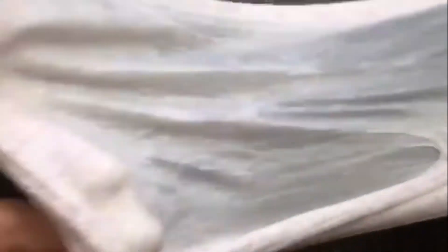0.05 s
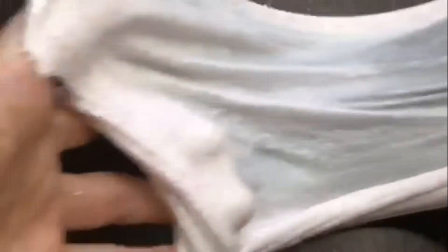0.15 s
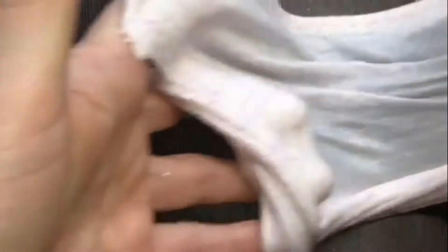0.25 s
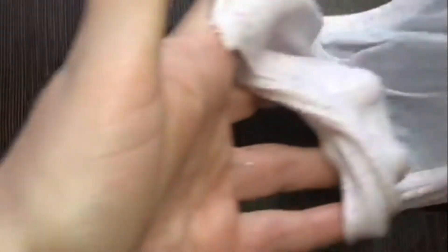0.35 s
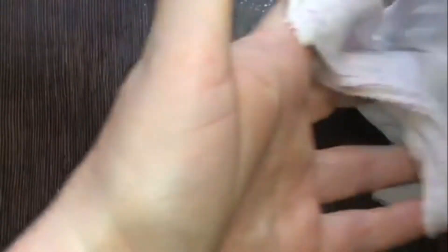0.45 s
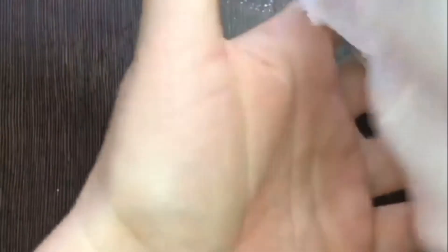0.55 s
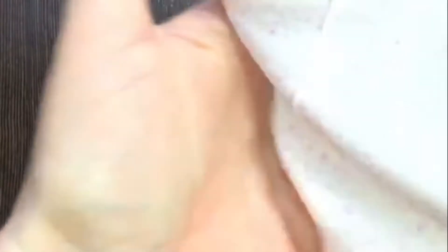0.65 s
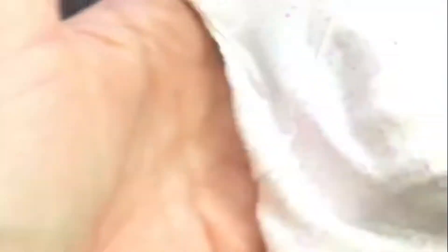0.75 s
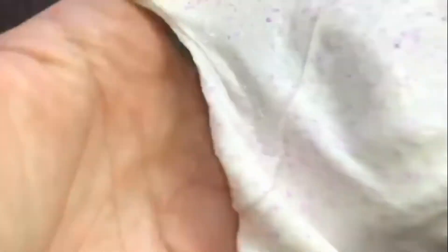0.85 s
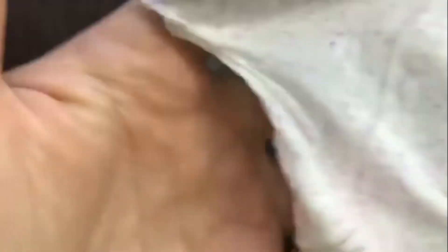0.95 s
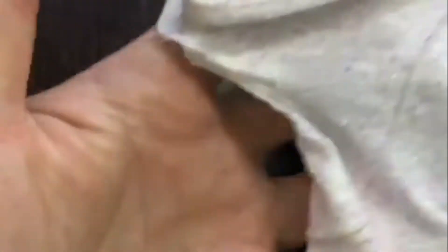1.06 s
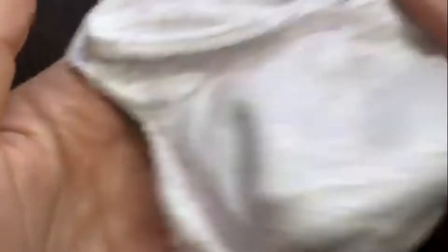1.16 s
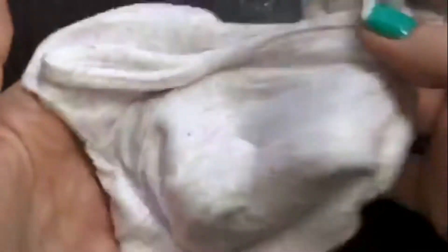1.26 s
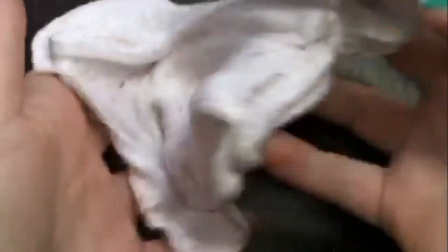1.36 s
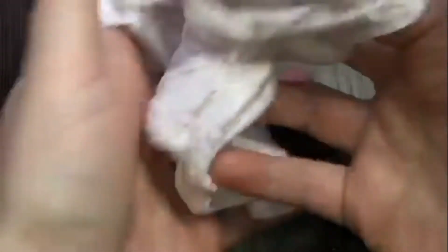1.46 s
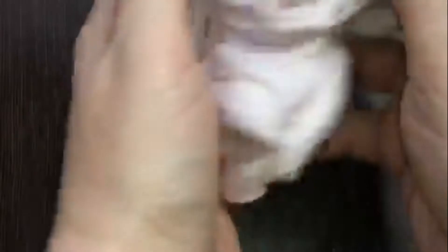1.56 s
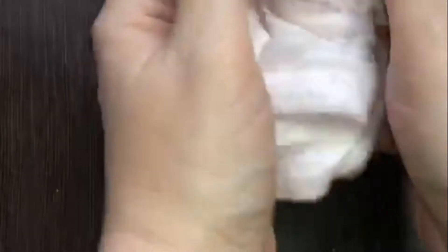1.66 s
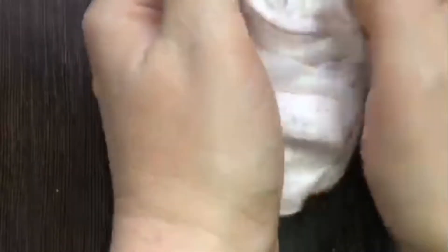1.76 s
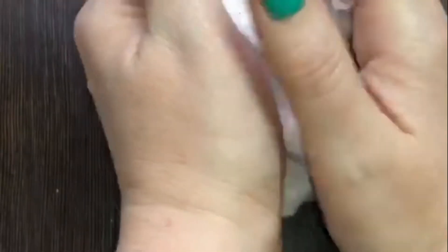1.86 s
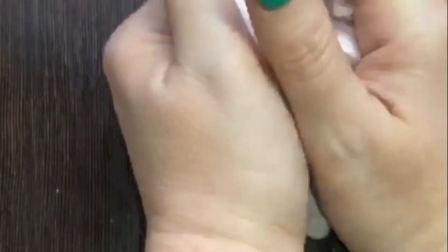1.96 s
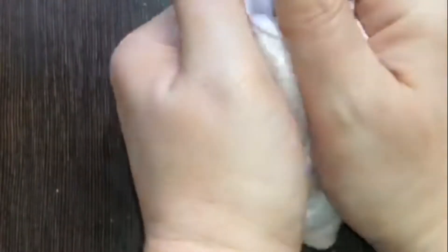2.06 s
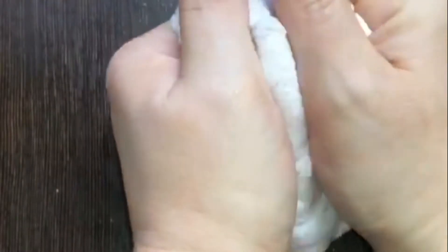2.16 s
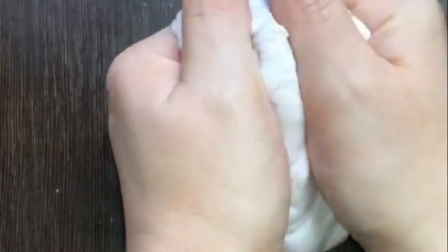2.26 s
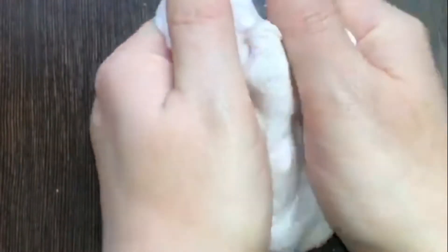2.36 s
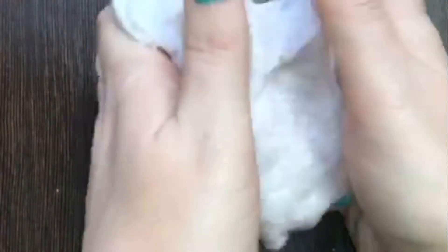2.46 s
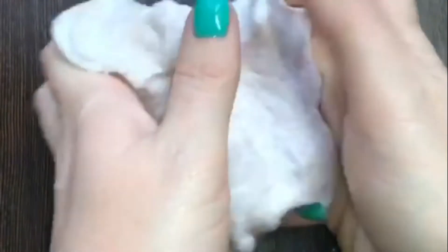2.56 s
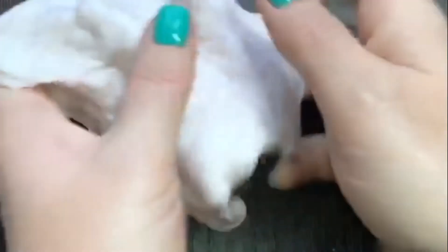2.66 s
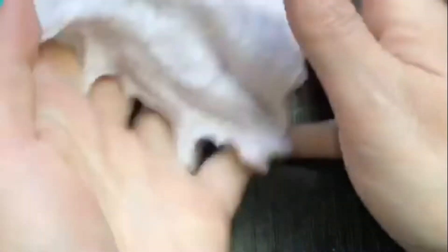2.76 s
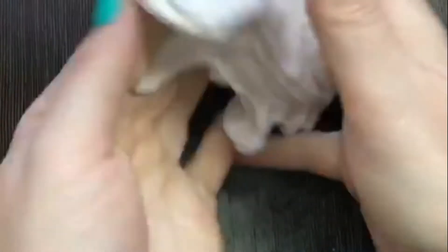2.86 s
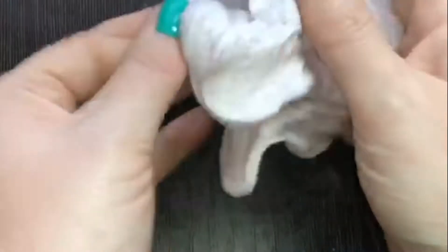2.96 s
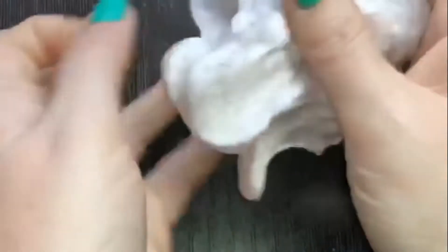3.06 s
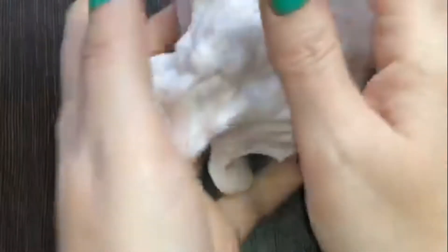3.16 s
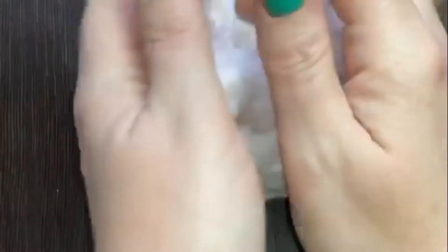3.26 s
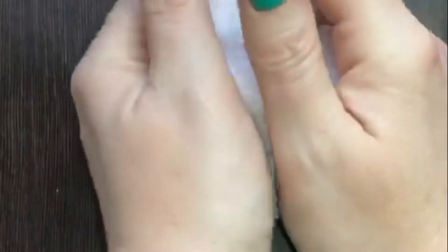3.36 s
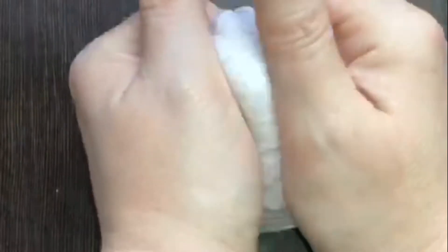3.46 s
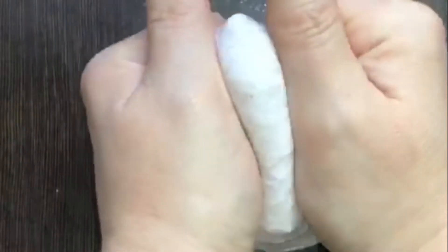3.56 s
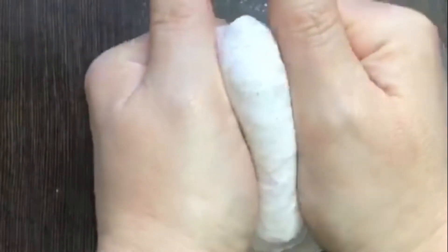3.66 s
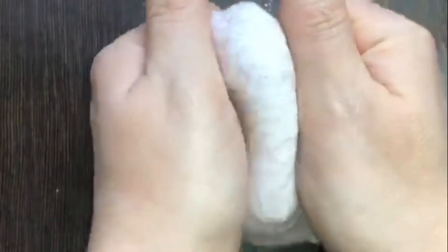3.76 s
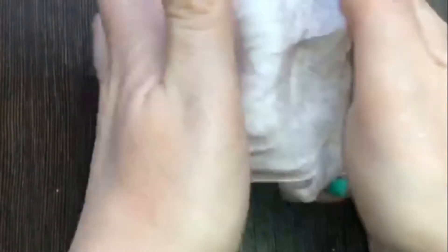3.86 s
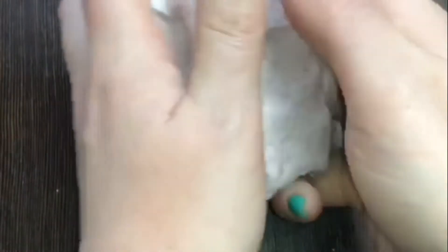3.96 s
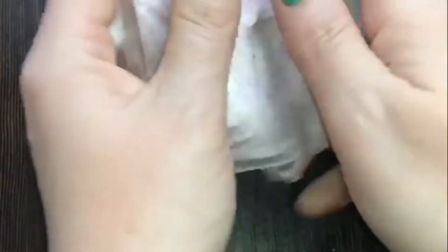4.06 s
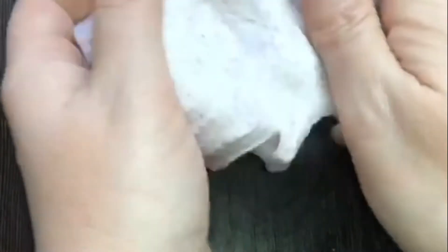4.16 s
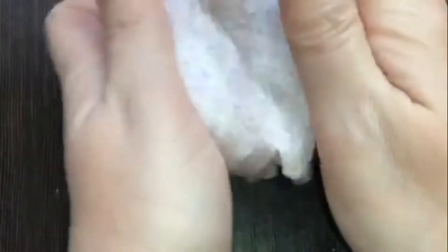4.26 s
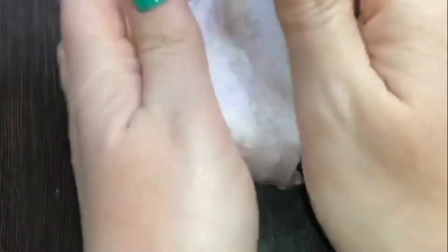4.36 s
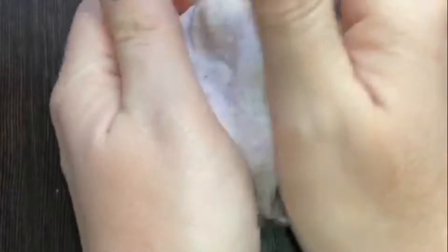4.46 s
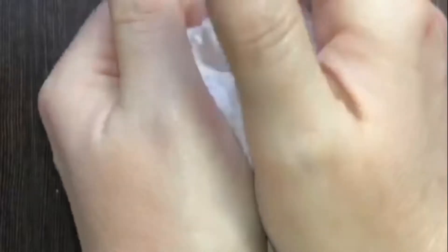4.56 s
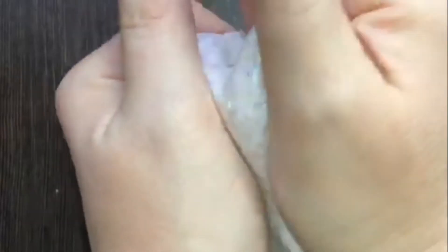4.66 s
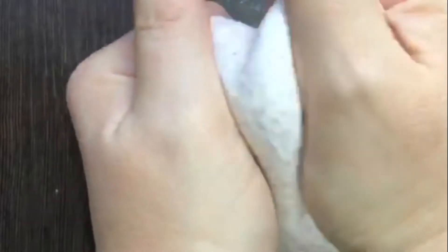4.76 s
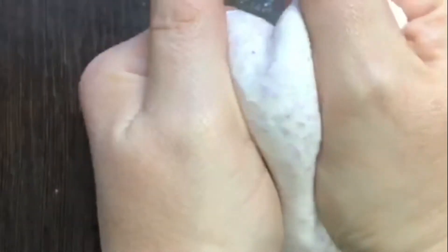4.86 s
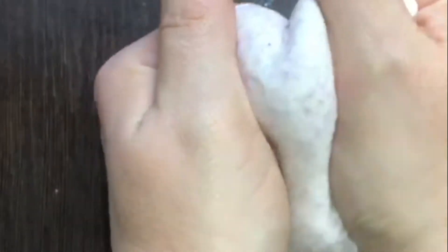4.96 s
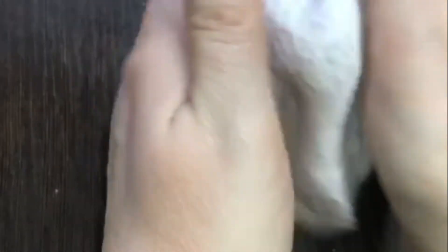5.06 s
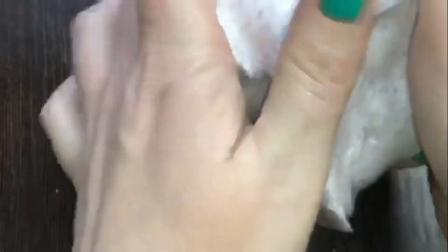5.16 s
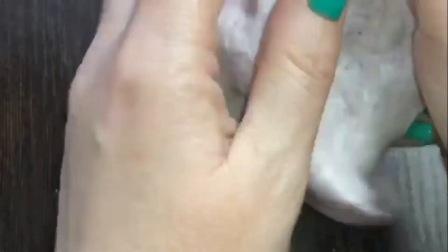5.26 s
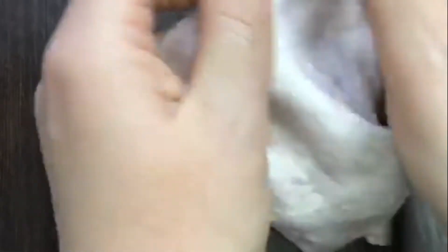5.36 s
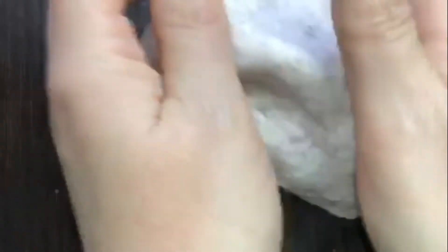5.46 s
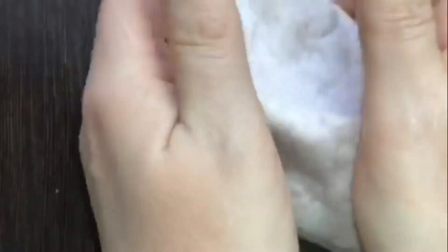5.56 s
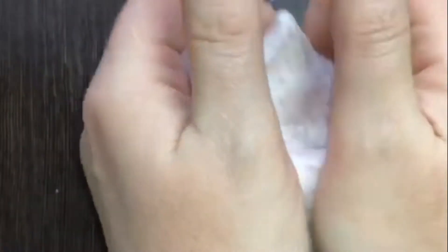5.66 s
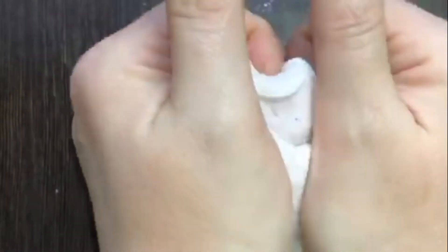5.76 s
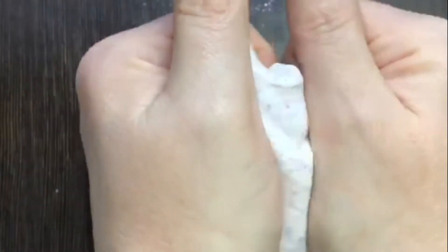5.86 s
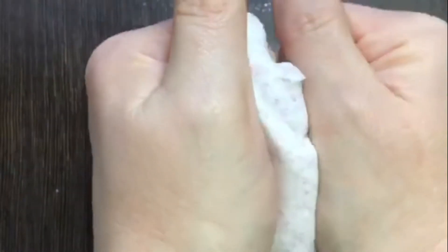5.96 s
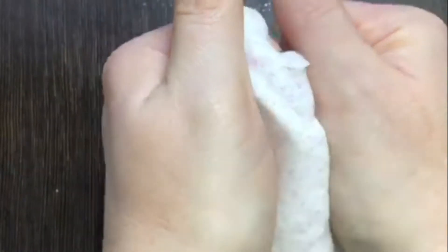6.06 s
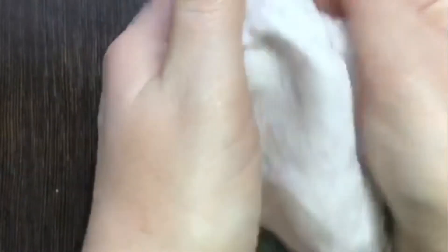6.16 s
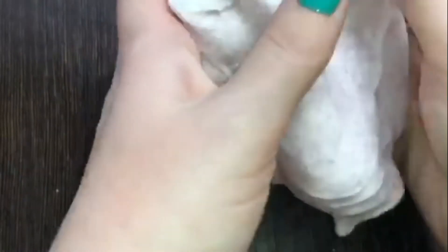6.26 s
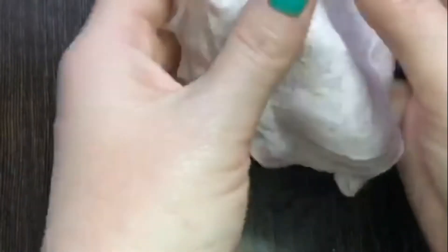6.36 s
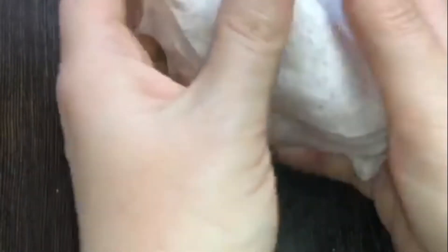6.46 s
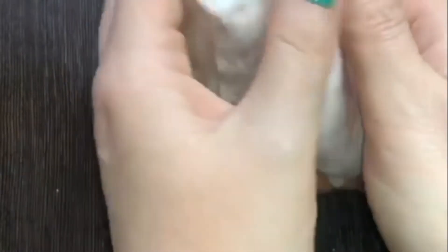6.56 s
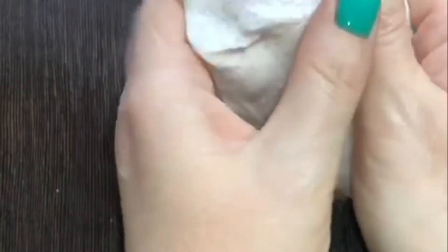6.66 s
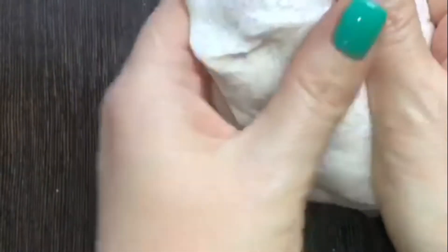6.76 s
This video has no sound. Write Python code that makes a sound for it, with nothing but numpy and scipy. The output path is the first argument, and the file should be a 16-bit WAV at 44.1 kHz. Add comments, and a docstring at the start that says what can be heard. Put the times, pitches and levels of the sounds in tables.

```python
"""A lump of slime, stretched, folded and squeezed in two hands, close to a single microphone.
Trapped air pockets burst with sharp pops; the sticky skin peels off the fingers with a fine crackle,
and wet hollows squelch and plop. Just below, hands or slime now and then knock a wooden table.
The place is a small quiet room: a short reverberation and a faint room tone lie behind it all."""
import sys
import numpy as np
from scipy import signal
from scipy.io import wavfile

SR = 44100
rng = np.random.default_rng(int(sys.argv[2]) if len(sys.argv) > 2 else 0)


def to_wav(s):
    """Save 16-bit WAV."""
    ch = np.atleast_2d(s).T  # columns
    pcm = np.round(np.clip(ch, -1, 1) * 32767)  # PCM
    wavfile.write(sys.argv[1], SR, pcm.astype(np.int16))


N = 299880

# Air pockets bursting close to the microphone:
# (time [s], 2-8 kHz peak [dB], pocket pitch [Hz], 0.8-2 kHz peak [dB], 7-17 kHz peak [dB])
AIR_POCKETS = [(0.5854, -54, 5650, -58.0, -60), (0.8005, -68, 12200, -48.0, -51.5),
               (1.3208, -56.5, 3000, -52, -46), (1.454, -24.5, 3820, -24.5, -19),
               (1.6936, -47.5, 4060, -47, -46), (1.7482, -47, 5600, -42, -32.5),
               (1.8563, -50.5, 5630, -61, -49), (1.8655, -35.0, 8550, -53, -41.5),
               (1.9037, -46, 1820, -49.5, -53), (1.9438, -35.5, 3070, -45.5, -63),
               (1.9478, -33, 2100, -36.5, -70.5), (1.9713, -26.5, 5900, -52, -24.5),
               (1.9795, -26, 6500, -42, -14.5), (1.9978, -39, 1900, -30, -37.5),
               (2.0239, -8, 5840, -20.5, -7), (2.0993, -18, 3300, -38, -20),
               (2.1173, -51.5, 9500, -56.5, -12), (2.145, -13.5, 4200, -23.5, -41),
               (2.1543, -13.5, 4000, -19.5, -8), (2.1867, -10, 6470, -41.5, -19),
               (2.1974, -31.5, 6870, -28, -51), (2.2244, -19, 12100, -23.5, -14),
               (2.2581, -15.5, 8000, -35, -15.5), (2.2711, -56.5, 11600, -52, -9),
               (2.2852, -12, 10900, -41, -21), (2.2988, -27.5, 6200, -37.5, -12),
               (2.5411, -47, 4360, -48, -48), (2.5768, -44, 4860, -45, -65), (2.7779, -44, 5670, -66, -38),
               (2.8697, -39.5, 3970, -37.5, -32), (3.0953, -56.5, 2930, -63.5, -56),
               (3.2268, -54.5, 3760, -72.0, -71), (3.2949, -50, 7650, -65, -72),
               (3.3285, -45.0, 8270, -77, -54.5), (3.3497, -38.5, 1850, -50, -35.5),
               (3.3944, -42.5, 9600, -49.5, -46), (3.4036, -24, 8500, -36, -28.5),
               (3.4126, -42, 3200, -52.5, -28), (3.4422, -28, 10900, -64.5, -34),
               (3.4492, -43.5, 3790, -50.5, -45.5), (3.4733, -17, 6060, -29, -39),
               (3.502, -17, 4200, -27.0, -19), (3.512, -41.5, 11700, -57.5, -42),
               (3.5192, -30, 5250, -46.5, -12), (3.5384, -36.5, 3070, -52.5, -46.5),
               (3.5559, -19, 4340, -26, -41.5), (3.5654, -55, 3770, -49, -22.5),
               (3.5743, -25.5, 4800, -55, -14), (3.5925, -34.5, 8700, -51, -18.5),
               (3.6005, -7, 7900, -31.5, -8.5), (3.6222, -41.5, 8100, -24.5, -20.5),
               (3.6354, -45, 8600, -63.5, -11.5), (3.6466, -13, 5640, -27, -16),
               (3.6876, -28.5, 12100, -49, -21), (3.729, -22.5, 2500, -26.5, -11.5),
               (3.7545, -37.5, 3170, -65.0, -23.5), (3.7692, -44, 10980, -68, -42.0),
               (3.8631, -42.0, 6350, -53, -43), (3.9153, -55, 2214, -30.5, -32),
               (3.9231, -56.0, 1210, -37.5, -45.0), (3.9381, -31.5, 820, -53, -50.0),
               (4.1391, -56.0, 1340, -45.5, -57.0), (4.1687, -36, 4180, -42.5, -24.0),
               (4.3604, -31, 6220, -38, -29.5), (4.5556, -86, 7360, -72.0, -54),
               (4.6289, -42.5, 12200, -58.5, -46), (4.6583, -69, 8100, -68, -39.0),
               (4.6775, -15.5, 7240, -75, -57), (4.6849, -25, 12900, -58, -18),
               (4.7051, -30, 7860, -42.5, -30), (4.7196, -30, 9800, -80, -32.5),
               (4.7528, -28.5, 6830, -41, -20), (4.7759, -16.5, 13600, -32.5, -16),
               (4.7808, -20, 8600, -63, -12), (4.8058, -28.5, 8950, -48, -48),
               (4.8105, -16.5, 11900, -39, -20.5), (4.844, -32.5, 5100, -61.5, -54.5),
               (4.8552, -31, 5740, -37, -30.5), (4.8873, -29.5, 5540, -41, -1.5),
               (4.8918, -12, 7560, -72, -24.5), (4.9311, -35.0, 8380, -45, -43.0),
               (4.9658, -27.5, 13600, -39, -16), (5.2764, -49.5, 3420, -52.5, -69),
               (5.3942, -32.5, 1420, -41, -55), (5.4136, -56, 1514, -37, -44),
               (5.4246, -39, 4250, -67.0, -65.0), (5.4462, -42, 12000, -59, -46.5),
               (5.8159, -26.5, 12100, -48, -22), (5.8459, -57.5, 4050, -53, -52),
               (5.8825, -42, 4800, -57.0, -30.5), (5.9135, -39, 7260, -47, -44),
               (5.9204, -41, 12300, -45.5, -36), (5.9425, -45.5, 4960, -67, -48),
               (5.965, -43.5, 6100, -46.5, -37), (5.9924, -22.5, 5000, -33.5, -37),
               (6.0678, -5.0, 9800, -25.5, -12.5), (6.2593, -51.0, 7900, -46, -31),
               (6.2933, -40, 990, -49.5, -35), (6.4144, -48.5, 3800, -55, -64),
               (6.4616, -44, 3470, -54.0, -68.0), (6.6362, -50.5, 6220, -57, -57),
               (6.773, -49, 5790, -54.5, -46)]


def pops(ring_db=4.0, puff_db=-14, low_lag_hz=150, min_width_hz=400, echo_db=-11, echo_t60_s=0.012):
    """The film snaps and the opened pocket rings; returns the pops bare and with near echoes."""
    pockets, length = list(AIR_POCKETS) + faint_pops(), 1024
    bare, near = np.zeros((2, N + length))
    t = np.arange(length) / SR
    # each pop has its own echoes off the fingers and the table
    echoes = from_db(echo_db - 60 * t / echo_t60_s) * rng.standard_normal((len(pockets), length))
    echoes[:, 0] = 1   # the direct sound
    snap = (t == 0) + 1e-18
    # the low part of each pop arrives slightly after the click
    r = np.exp(-2 * np.pi * low_lag_hz / SR)
    low_lag = signal.lfilter([r * r, -2 * r, 1], [1, -2 * r, r * r], snap)
    puff, low = -band(low_lag, 100, 450), band(low_lag, 800, 2000)
    mid, high = -band(band(snap, 2000, 8000), 2000, 8000), band(snap, 7000, 17000)
    for (time_s, mid_db, hz, low_db, high_db), echo in zip(pockets, echoes):
        pitch_band_db, sign = (low_db, 1) if hz < 2000 else (mid_db, -1) if hz < 7000 else (high_db, 1)
        # a violent burst tears the pocket wide open and barely rings; a gentle one keeps a narrow mouth
        q = np.clip(-pitch_band_db / 4, 4, 14)
        ring = sign * resonance(snap, hz, max(hz / q, min_width_hz))   # soft walls always damp it
        at = round(time_s * SR)
        for part, peak_db in ((puff, low_db + puff_db), (low, low_db), (mid, mid_db), (high, high_db),
                              (ring, pitch_band_db + ring_db)):
            echoed = signal.fftconvolve(part, echo)[:length]
            gain = from_db(peak_db) / np.abs(echoed).max()
            bare[at:at + length] += gain * part * np.linalg.norm(echo)
            near[at:at + length] += gain * echoed
    return bare[:N], near[:N]


def faint_pops(count=90, over_crackle_db=7.5, spread_db=8.5, mid_limit_db=-43):
    """Small pockets tear at random, as strongly as the skin is pulled; rows like AIR_POCKETS."""
    when, size, pitch, body, edge = rng.random((count, 5)).T
    first_pull_s = PULLS[0][0]
    time_s = first_pull_s + when * (N / SR - first_pull_s)
    crackle_db = 20 * np.log10(pull("crackle")[(time_s * SR).astype(int)])
    mid_db = np.minimum(crackle_db + over_crackle_db + spread_db * (2 * size - 1), mid_limit_db)
    hz = 2500 * (12000 / 2500) ** pitch
    low_db = mid_db - 30 * body
    high_db = mid_db + spread_db * (2 * edge - 1)
    return list(zip(time_s, mid_db, hz, low_db, high_db))


# The sticky skin lets go of a finger or palm:
# (time of fullest pull [s], swell [s], fade [s], crackle level [dB], squelch level [dB])
PULLS = [(0.576, .06, 0.047, -68.5, -71), (.81, .03, 0.09, -63.5, -58), (1.0, 0.22, 0.099, -71.5, -73.5),
         (1.165, 0.018, 0.014, -73, -62.5), (1.251, 0.062, 0.084, -65.5, -60.5),
         (1.33, 0.036, 0.34, -68.5, -70), (1.43, .2, 0.044, -67, -71), (1.458, 0.021, 0.2, -64, -62),
         (1.651, 0.037, 0.016, -61, -59), (1.717, 0.05, 0.088, -52, -56.5), (1.862, 0.11, 0.019, -63, -80),
         (1.921, 0.0081, .015, -74, -59), (2.5, 0.65, .15, -50.5, -59.5), (2.585, 0.3, 0.027, -52.5, -55),
         (2.734, 0.081, 0.22, -55.5, -59), (2.879, .03, .04, -70, -57), (2.957, 0.022, 0.039, -58.5, -64),
         (3.006, 0.014, 0.03, -51, -50), (3.06, .05, 0.044, -63, -62), (3.135, .015, .02, -64, -67.5),
         (3.197, .06, .09, -73, -75), (3.37, 0.053, 0.057, -63, -63.5), (3.885, 0.065, 0.13, -43.5, -49),
         (4.143, 0.084, 0.07, -56, -58), (4.232, 0.025, 0.017, -51, -70), (4.297, 0.013, 0.048, -54.5, -61),
         (4.357, 0.069, 0.09, -58, -65.5), (4.468, 0.082, 0.01, -53.5, -63.5),
         (4.566, 0.11, 0.043, -68.5, -80.5), (4.672, 0.005, 0.23, -52, -55),
         (5.055, 0.0071, 0.06, -63, -63.5), (5.158, 0.11, 0.097, -47.5, -54), (5.304, .06, 0.065, -56, -66),
         (5.419, 0.082, 0.023, -56, -65), (5.551, 0.021, 0.016, -58.5, -65),
         (5.603, 0.041, 0.066, -59, -61), (5.727, 0.048, 0.072, -72, -78), (5.817, 0.047, 0.064, -63, -68),
         (5.9, .04, 0.095, -75, -65), (6.0, 0.013, 0.59, -65.5, -72), (6.262, 0.26, 0.13, -47.5, -57.5),
         (6.47, 0.11, 0.0053, -56, -55.5), (6.562, .05, 0.08, -62.5, -68), (6.644, 0.033, 0.062, -60, -67),
         (6.742, 0.016, 0.0095, -61.5, -66), (6.8, 0.14, 0.12, -67.5, -85)]


def pull(layer, range_db=20):
    """Gain of crackle or squelch: a pull gains range_db over its swell and loses it over its fade."""
    time_s, swell_s, fade_s, crackle_db, squelch_db = np.transpose(PULLS)[:, :, None]
    level_db = {"crackle": crackle_db, "squelch": squelch_db}[layer]
    steps = np.arange(0, N + 64, 64)
    since_s = steps / SR - time_s
    away = np.where(since_s < 0, -since_s / swell_s, since_s / fade_s)
    power = from_db(level_db - range_db * away) ** 2
    return np.interp(np.arange(N), steps, np.sqrt(power.sum(axis=0)))


# The peeling skin heard from close by: (frequency [Hz], spectral level [dB])
CRACKLE_SPECTRUM = [(900, -18.5), (1800, -39), (3000, -3.5), (5400, -9.5), (9000, -10.5), (13800, -18.5),
                    (16000, -12.5)]
# Hollows between the palms: (frequency [Hz], width [Hz], level [dB])
PALM_HOLLOWS = [(860, 110, -5), (1354, 150, -4), (481.5, 300, -14), (1800, 310, -7.5)]


def peeling(bubble_db=-2):
    """Dense snaps give a bright crackle; slower wet ones excite the hollows between the palms."""
    snaps = thread_snaps(per_s=6000, spread_db=3.0, clump_db=6.0)
    crackle = rms_one(coloured(snaps, CRACKLE_SPECTRUM)) + from_db(bubble_db) * small_bubbles()
    wet_snaps = thread_snaps(per_s=3300, spread_db=6.0, clump_db=2.5)
    squelch = rms_one(sum(from_db(db) * resonance(wet_snaps, hz, width) for hz, width, db in PALM_HOLLOWS))
    return pull("crackle") * crackle + pull("squelch") * squelch


def thread_snaps(per_s, spread_db, clump_db):
    """Tiny threads snap at random, mostly small, in clumps around a base rate per_s; rms 1."""
    sizes = from_db(spread_db * np.minimum(rng.exponential(1, N), 5)) * rng.choice([-1, 1], N)
    snapping = rng.random(N) < per_s * from_db(clump_db * drift(rate_hz=40)) / SR
    return rms_one(sizes * snapping + 1e-18)


def small_bubbles(per_s=200, low_hz=1200, high_hz=9000, q=3.2, sputter_t60_s=0.024):
    """Scattered little bubbles sputter out briefly at a pitch set by their size; rms 1."""
    bursts = thread_snaps(per_s, spread_db=5.5, clump_db=4.5)
    size_class = rng.integers(0, 16, N)
    decay = from_db(-60 / (sputter_t60_s * SR))
    hiss, out = rng.standard_normal(N), np.zeros(N)
    for k, hz in enumerate(np.geomspace(low_hz, high_hz, 16)):
        envelope = signal.lfilter([1], [1, -decay], bursts * (size_class == k) + 1e-18)
        out += resonance(hiss * envelope, hz, hz / q)
    return rms_one(out)


# Wet hollows closing or opening in the hands: (time [s], peak level [dB], starting pitch [Hz])
WET_PLOPS = [(0.803, -50.5, 480), (1.278, -50.5, 550), (2.04, -29, 857), (2.491, -44, 830),
             (3.007, -52, 874), (3.052, -58, 617), (4.292, -50.5, 810), (5.158, -50, 910),
             (5.394, -38, 856), (6.25, -44, 837), (6.28, -48, 438), (6.293, -51, 880), (6.668, -50.5, 855)]


def plops(t60_cycles=9.0, attack_s=0.0027, climb=0.084):
    """Each plop is a short damped tone that climbs as the hollow shrinks."""
    out, t = np.zeros(N + 2048), np.arange(2048) / SR
    for time_s, peak_db, hz in WET_PLOPS:
        age = hz * t / t60_cycles   # 1 when the tone has decayed by 60 dB
        turns = hz * t * (1 + climb * age / 2)
        envelope = from_db(-60 * age) * (1 - np.exp(-t / attack_s))
        at = round(time_s * SR)
        out[at:at + len(t)] += from_db(peak_db) * envelope / envelope.max() * np.sin(2 * np.pi * turns)
    return out[:N]


# Knocks on the table just below the hands: (time [s], level [dB])
TABLE_KNOCKS = [(.802, -55), (1.456, -30), (2.038, -43.5), (2.223, -67), (2.615, -43), (2.871, -47.5),
                (3.923, -29), (4.138, -49.5), (4.361, -41.5)]
# Modes of the wooden top: (frequency [Hz], level [dB], 60 dB decay time [s])
TABLE_MODES = [(54, -20.5, 0.32), (100, -16, 0.06), (140, -10.5, 0.29), (163, -11.5, 0.098),
               (187.7, -11, 0.2), (210, -9, 0.11), (249, -5.5, 0.12), (317, -1.5, 0.024), (500, -3, 0.017)]


def knocks(contact_hz=900, spread_db=1.5):
    """Each soft push strikes every mode of the table top with a strength of its own."""
    time_s, knock_db = np.transpose(TABLE_KNOCKS)
    strength_db = rng.normal(0, spread_db, (len(TABLE_KNOCKS), len(TABLE_MODES)))
    wood = np.zeros(N)
    for k, (hz, mode_db, t60_s) in enumerate(TABLE_MODES):
        hits = np.full(N, 1e-18)
        hits[np.round(time_s * SR).astype(int)] = from_db(knock_db + mode_db + strength_db[:, k])
        r, w = from_db(-60 / (t60_s * SR)), 2 * np.pi * hz / SR
        wood += signal.lfilter([0, np.sin(w)], [1, -2 * r * np.cos(w), r * r], hits) * (-1) ** k
    return signal.sosfilt(signal.butter(2, contact_hz, fs=SR, output="sos"), wood)


# Reverberation of the small room: (frequency [Hz], 60 dB decay time [s])
ROOM_DECAY = [(300, 0.07), (800, 0.24), (2000, 0.27), (5500, 0.28), (9000, 0.26), (14600, 0.067)]
# Colour of its reflections at the microphone: (frequency [Hz], level [dB])
ROOM_SPECTRUM = [(300, 4), (800, 0), (1500, -2.5), (2700, -6.5), (3800, -6), (5500, -4.5), (9000, -8),
                 (15000, 3)]


def room(x, build_up_s=0.00073):
    """Diffuse reflections: noise that dies at its own rate in each half octave."""
    t, edges = np.arange(SR // 2) / SR, 100 * 2 ** np.arange(0, 7.6, .5)
    noise, tail = rng.standard_normal((2, len(t))), 0
    for k, (lo, hi) in enumerate(zip(edges, edges[1:])):
        hz = np.sqrt(lo * hi)
        envelope = from_db(at_hz(ROOM_SPECTRUM, hz) - 60 * t / at_hz(ROOM_DECAY, hz))
        tail = tail + band(noise[k % 2], lo, hi) * envelope
    tail = tail * np.clip(t / build_up_s, 0, 1)
    return signal.fftconvolve(x, tail / np.sqrt(np.sum(tail ** 2)))[:N]


# The quiet room behind the hands: (frequency [Hz], spectral level [dB])
ROOM_TONE_SPECTRUM = [(18, -49), (30, -6.5), (161, -6), (194, 7), (259, -10), (280, -18.5), (374, -11.5),
                      (449, -23.5), (486, -8.5), (684, -21), (9710, -32.5), (10800, -31), (16000, -37)]


def room_tone():
    """A steady low hush with a thin hiss above it; rms 1."""
    return rms_one(coloured(rng.standard_normal(N + SR), ROOM_TONE_SPECTRUM)[SR:])


def from_db(db):
    """Decibels to gain."""
    return 10 ** (np.asarray(db) / 20)


def rms_one(x):
    """Scale to rms 1."""
    return x / np.sqrt(np.mean(x ** 2) + 1e-20)


def at_hz(points, hz):
    """Read a table on a log-frequency axis."""
    frequencies, values = np.transpose(points)
    return np.interp(np.log(hz), np.log(frequencies), values)


def band(x, low_hz, high_hz):
    """Band-pass along the last axis."""
    return signal.sosfilt(signal.butter(2, [low_hz, high_hz], "band", fs=SR, output="sos"), x)


def coloured(x, spectrum):
    """Half-octave filter bank that gives x the spectrum."""
    edges = 25 * 2 ** np.arange(0, 9.7, .5)
    return sum(from_db(at_hz(spectrum, np.sqrt(lo * hi))) * band(x, lo, hi) * (-1) ** k
               for k, (lo, hi) in enumerate(zip(edges, edges[1:])))


def resonance(x, hz, width_hz):
    """Two-pole resonance with gain 1 at its peak."""
    r, w = np.exp(-np.pi * width_hz / SR), 2 * np.pi * hz / SR
    gain = (1 - r * r) / 2
    return signal.lfilter([gain, 0, -gain], [1, -2 * r * np.cos(w), r * r], x)


def drift(rate_hz):
    """Smooth random wander; rms 1."""
    r = np.exp(-2 * np.pi * rate_hz / SR)
    return rms_one(signal.lfilter([1], [1, -2 * r, r * r], rng.standard_normal(N + SR))[SR:])


def scene(reverb_db=-11, room_tone_db=-71):
    """Slime and table close to the microphone, the small room behind them; mono."""
    bare_pops, near_pops = pops()
    skin = peeling() + plops()
    table = knocks()
    hush = from_db(room_tone_db) * room_tone()
    table_reach = from_db(1.5)   # the wide table top carries further into the room
    reverb = from_db(reverb_db) * room(bare_pops + skin + table_reach * table)
    return (near_pops + skin + table + reverb + hush)[None]


def record(dry, ceiling=0.7, low_cut_hz=60, top_hz=17000):
    """Rounds the loudest peaks and cuts the deep bass; nothing sounds above about 17 kHz."""
    rounded = ceiling * np.tanh(dry / ceiling)
    low_cut = signal.sosfilt(signal.butter(2, low_cut_hz, "high", fs=SR, output="sos"), rounded)
    return signal.sosfilt(signal.cheby2(14, 80, top_hz, fs=SR, output="sos"), low_cut)


dry = scene()
out = record(dry)
to_wav(out)
```